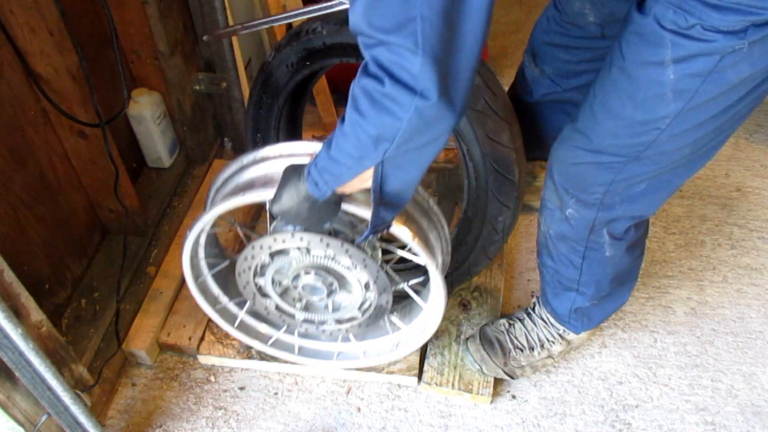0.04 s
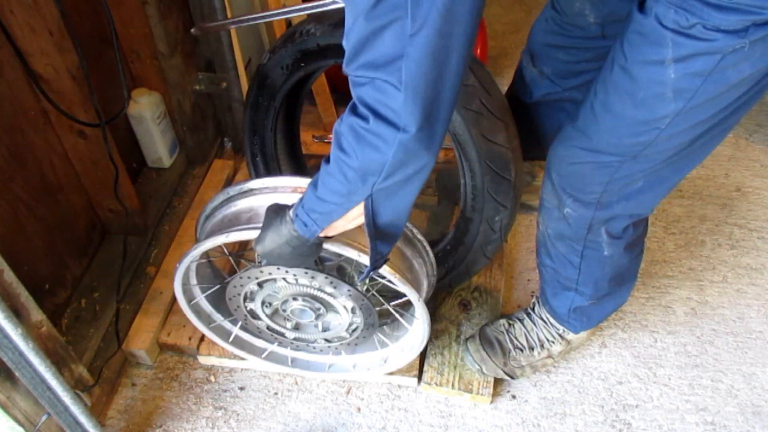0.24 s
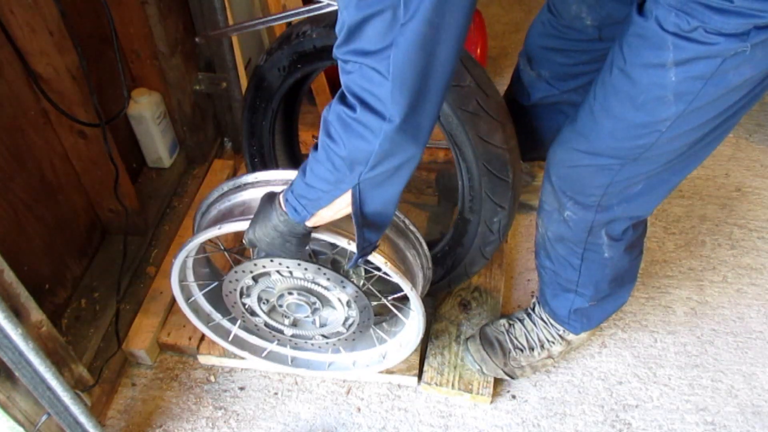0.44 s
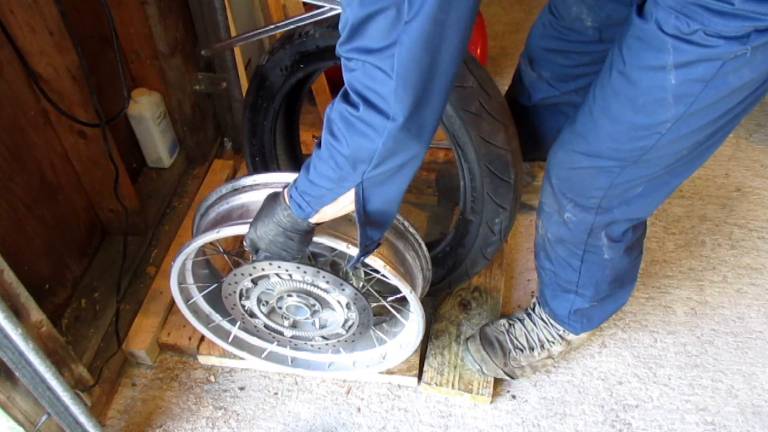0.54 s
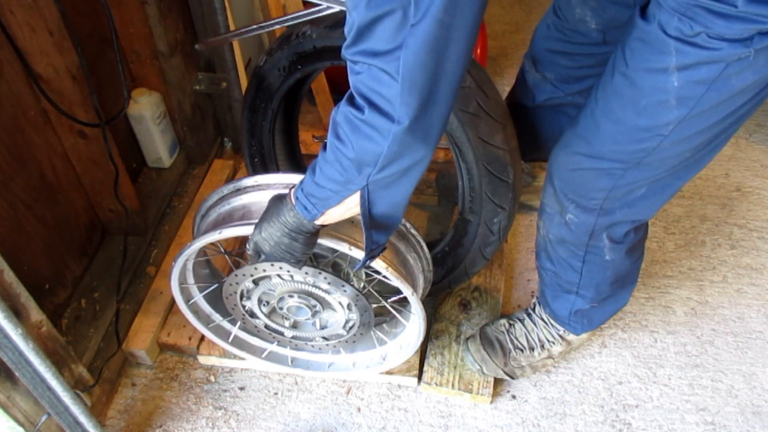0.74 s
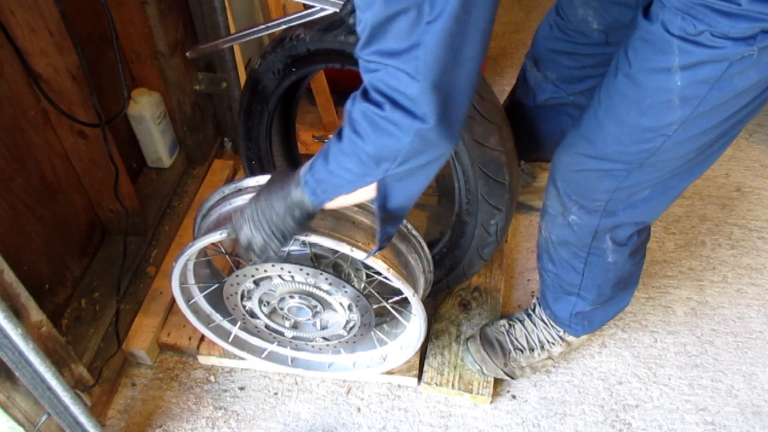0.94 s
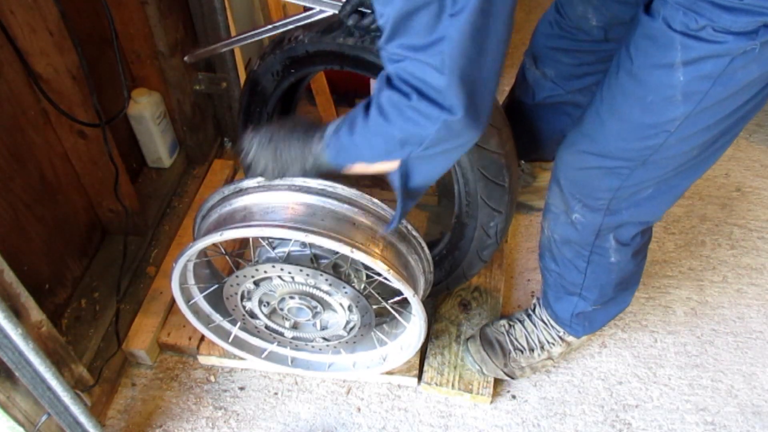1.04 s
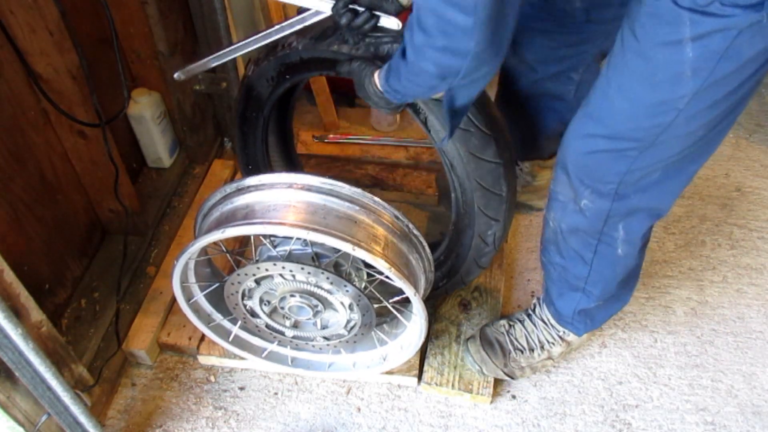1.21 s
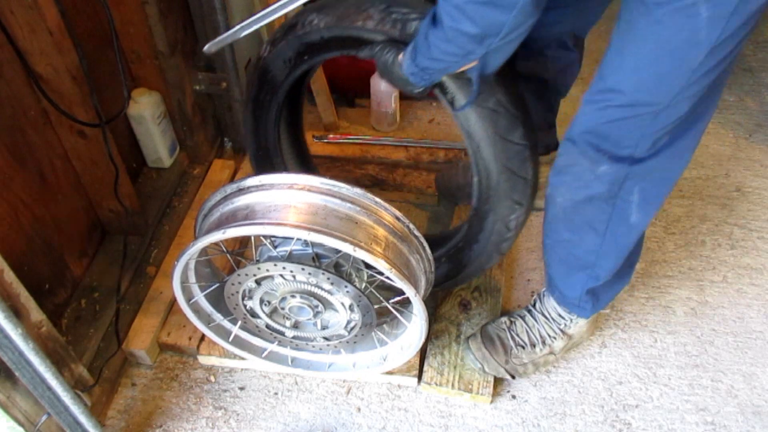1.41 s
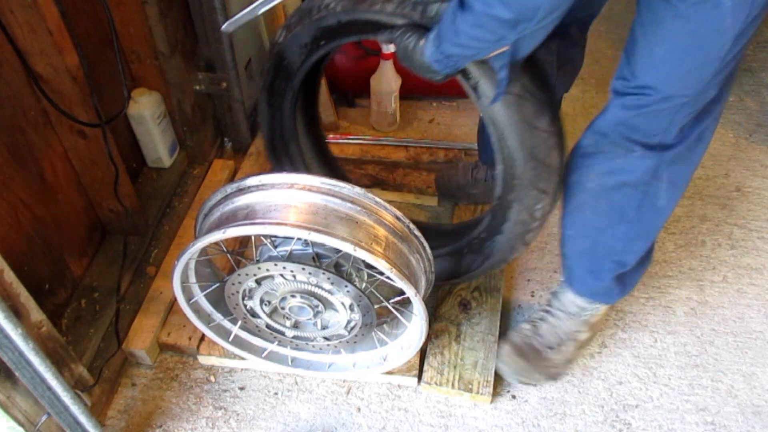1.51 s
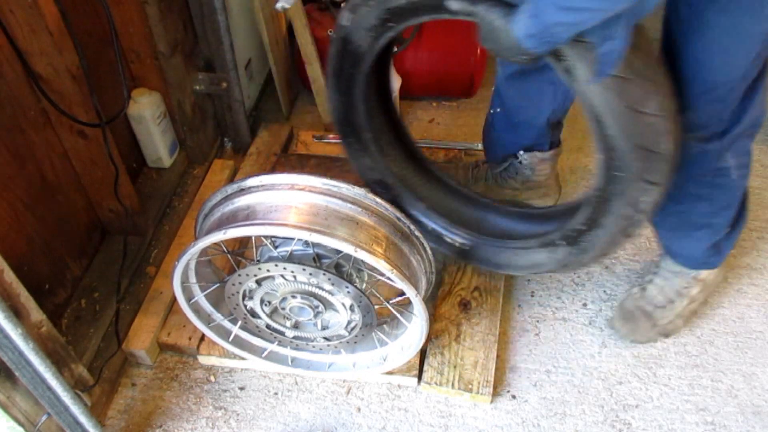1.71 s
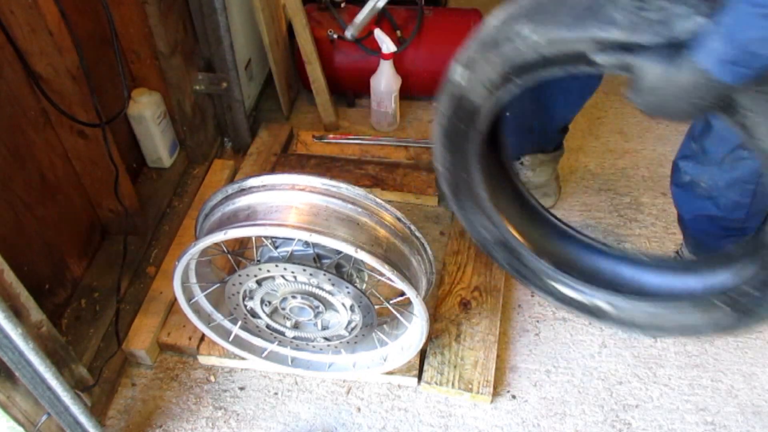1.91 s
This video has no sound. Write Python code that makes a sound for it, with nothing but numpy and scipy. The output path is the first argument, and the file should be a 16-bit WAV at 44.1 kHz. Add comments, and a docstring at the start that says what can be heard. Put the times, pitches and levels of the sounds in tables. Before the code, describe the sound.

A metal wheel rim lands on a wooden frame with a loud, close thud and a fading ring. Then overalls rustle faintly and a tire is lifted with soft bumps and scuffs in a small workshop.

```python
"""A thud and a metallic ring: a wheel rim is set down on a wooden frame in a small workshop.
One edge touches, then the whole weight lands; the frame knocks, the floor rumbles, the rim rings on.
Overalls rustle, a tire is gripped, lifted and scuffs along; a small bird chirps faintly far off.
The thud overloads the microphone and ducks its gain, which creeps back."""
import sys
import numpy as np
from scipy import signal
from scipy.fft import rfft, irfft
from scipy.io import wavfile

SR = 44100
rng = np.random.default_rng(int(sys.argv[2]) if len(sys.argv) > 2 else 0)


def pcm_store(signal):
    """Save signal as 16-bit PCM."""
    levels = np.round(np.clip(np.atleast_2d(signal), -1, 1) * 32767)
    wavfile.write(sys.argv[1], SR, levels.astype(np.int16).T)


N = 85995
T = np.arange(N) / SR

# rim on frame: (time [s], mode level [dB], place [0 edge .. 1 flat], crack level [dB])
BLOWS = [(0.2224, -13.5, 0.16, -32), (0.2510, -11.5, 0.6, -40), (0.254, 1, 0.91, -42.5),
         (0.2574, -28, 1, -21.5), (0.2637, -13.5, 0.38, -39)]
LANDING_S = max(BLOWS, key=lambda row: row[1])[0]  # hardest blow


def from_db(db):
    """Decibels to gain."""
    return 10 ** (np.asarray(db) / 20)


def noise(colour):
    """Unit-rms noise above 18 Hz; colour rows are (frequency [Hz], level [dB])."""
    hz, db = np.transpose(colour)
    bins_hz = np.maximum(np.arange(N // 2 + 1) * SR / N, 1)
    gain = from_db(np.interp(np.log(bins_hz), np.log(hz), db)) * (bins_hz > 18)
    x = irfft(rfft(rng.standard_normal(N)) * gain, N)
    return x / x.std()


def lowpass(x, hz, order=2):
    """Butterworth low-pass."""
    return signal.sosfilt(signal.butter(order, min(hz, .45 * SR), fs=SR, output="sos"), x + 1e-18)


def decay(at_s, t60_s):
    """Exponential decay from at_s."""
    return (T >= at_s) * from_db(-60 * np.maximum(T - at_s, 0) / t60_s)


def ring(at_s, hz, t60_s):
    """One struck mode; the yielding contact builds it up over its first cycles."""
    build_s = min(1.884 / hz, .005)
    build = np.sin(np.pi / 2 * np.clip((T - at_s) / build_s, 0, 1)) ** 2
    return build * decay(at_s, t60_s) * np.sin(2 * np.pi * hz * (T - at_s))


def swell(peak_s, rise_s, fall_s):
    """Gaussian envelope with separate rise and fall widths."""
    return np.exp(-.5 * ((T - peak_s) / np.where(T < peak_s, rise_s, fall_s)) ** 2)


def air():
    """Steady, dark background noise."""
    # spectrum: (frequency [Hz], level [dB])
    colour = [(25, -11), (80, -6.5), (230, -11), (380, -14), (600, -15), (1000, -17.5), (2800, -23),
              (6000, -27), (10000, -32), (13000, -36.5), (15800, -44)]
    return from_db(-57.5) * noise(colour)


def workshop_echo(x):
    """Diffuse echo of the wooden room; the treble dies sooner."""
    # room response: (frequency [Hz], level [dB])
    colour = [(40, -13.5), (150, -3), (350, -3.5), (550, -1), (850, -10.5), (1300, -1), (2000, -1.5),
              (2450, 6), (2700, 1.5), (4000, 2.5), (6000, 2.5), (15000, -10)]
    nearest_wall_s, build_s = .005, .0063
    diffuse = noise(colour)
    low = lowpass(diffuse, hz=2700, order=1)
    tail = low * decay(0, t60_s=.33) + (diffuse - low) * decay(0, t60_s=.22)
    tail *= 1 - np.exp(-np.maximum(T - nearest_wall_s, 0) / build_s)
    return signal.fftconvolve(x, tail / np.sqrt(np.sum(tail ** 2)))[:N]


def bird():
    """Short gliding whistles."""
    # chirps: (time [s], length [s], start [Hz], end [Hz], level [dB])
    chirps = [(0.935, 0.03, 3200, 2960, -57), (1.09, 0.019, 2600, 2970, -58),
              (1.134, .024, 2550, 3420, -58), (1.153, .02, 3650, 3450, -61),
              (1.161, 0.036, 3200, 2560, -54.5)]
    out = 0
    for at_s, length_s, start_hz, end_hz, db in chirps:
        along = np.clip((T - at_s) / length_s, 0, 1)
        hz = start_hz + (end_hz - start_hz) * along
        out += from_db(db) * np.sin(np.pi * along) * np.sin(2 * np.pi * np.cumsum(hz) / SR)
    return out


def grain(depth_db, bandwidth_hz):
    """Uneven catching of a rubbed surface, as a unit-rms gain."""
    jitter = lowpass(rng.standard_normal(N), bandwidth_hz)
    gain = from_db(-depth_db * jitter / jitter.std())
    return gain / np.sqrt(np.mean(gain ** 2))


def scuffs():
    """Cloth and rubber scuff: a hiss over a low scrape."""
    # strokes: (peak [s], level [dB], rise [s], fall [s], scrape re hiss [dB])
    strokes = [(0.075, -59, 0.046, 0.066, -2.5), (1.244, -53.5, .002, 0.008, -34),
               (1.318, -57.5, 0.033, 0.041, -11), (1.324, -55, 0.0063, 0.0052, 6),
               (1.582, -64, 0.32, 0.12, 1), (1.85, -56.5, 0.028, 0.023, 6.5)]
    # friction spectra: (frequency [Hz], level [dB])
    hiss_colour = [(300, -9), (1000, -14), (2000, -1), (4500, -1.5), (8000, -4.5), (12000, -10),
                   (16000, -23.5)]
    scrape_colour = [(30, -4), (130, -5), (300, -6.5), (500, -2), (750, -2.5), (1100, -11), (2200, -13.5),
                     (6000, -38)]
    hiss, scrape = noise(hiss_colour), noise(scrape_colour)
    return sum(from_db(db) * swell(peak_s, rise_s, fall_s) * (hiss + from_db(scrape_db) * scrape)
               for peak_s, db, rise_s, fall_s, scrape_db in strokes)


def slides():
    """Rubber and glove slide: slow swells of resonant noise."""
    # strokes: (peak [s], level [dB], rise [s], fall [s])
    strokes = [(0.138, -62, 0.11, 0.14), (1.91, -52, 0.14, .15)]
    # friction spectrum: (frequency [Hz], level [dB])
    colour = [(100, -11.5), (400, -8.5), (1100, -5), (1350, 2.5), (1600, -10), (2050, -8), (2300, 5.5),
              (2600, -5), (3100, 3.5), (3650, -9), (4100, -1.5), (4400, -7), (4700, 0.5), (5200, -16),
              (15000, -30)]
    envelope = sum(from_db(db) * swell(peak_s, rise_s, fall_s) for peak_s, db, rise_s, fall_s in strokes)
    return noise(colour) * envelope


def clicks():
    """Glove and spokes tick as the grip shifts."""
    # ticks: (time [s], level [dB], t60 [s])
    ticks = [(0.121, -37, 0.012), (0.127, -32.5, 0.0089), (0.134, -53, 0.015), (0.1382, -49, 0.057),
             (1.243, -50.5, 0.011), (1.3245, -50, 0.006)]
    # tick spectrum: (frequency [Hz], level [dB])
    colour = [(200, -2.5), (1200, 0.5), (2200, -9), (2800, 8.5), (3500, -2), (7000, -10.5), (15000, -30.5)]
    return noise(colour) * sum(from_db(db) * decay(at_s, t60_s) for at_s, db, t60_s in ticks)


def knocks():
    """Dull bumps of tire and boot; a softer contact leaves only the low modes."""
    # bumps: (time [s], level [dB], cutoff [Hz])
    bumps = [(1.2955, -27.5, 101), (1.321, -54.5, 550), (1.414, -53.5, 500), (1.53, -54, 1000),
             (1.6085, -44.5, 1600), (1.823, -43.5, 600), (1.8443, -40.5, 500), (1.902, -41, 380)]
    # tire modes: (frequency [Hz], level [dB], t60 [s])
    modes = [(74.1, -38.5, 0.15), (164, -6.5, 0.089), (301.7, 1, 0.075), (421, -5, 0.061), (617, -3, 0.044),
             (790, 3.5, 0.028), (1095, 12, 0.011), (1620, 5.5, 0.018)]
    out = 0
    for at_s, db, cutoff_hz in bumps:
        for k, (hz, mode_db, t60_s) in enumerate(modes):
            gain = from_db(db + mode_db) / np.hypot(1, (hz / cutoff_hz) ** 2)
            out += (-1) ** k * gain * ring(at_s, hz, t60_s)
    return out


def floor_boom():
    """Floor and walls rumble after the landing."""
    # rumble spectrum: (frequency [Hz], level [dB])
    colour = [(25, -6), (55, 6), (100, 0.5), (145, -4), (200, -19.5), (400, -50)]
    rise_s = .014
    onset = np.clip((T - LANDING_S) / rise_s, 0, 1)
    return from_db(-40) * noise(colour) * onset * decay(LANDING_S, t60_s=1.05)


def rim():
    """The rim hums in the hand, then rings in close, beating modes from the landing."""
    # free rim modes: (frequency [Hz], level [dB], t60 [s])
    modes = [(398, -34, 0.28), (621, -33.5, 0.2), (716, -56, 4), (746, -38.5, 2.64), (990, -44, 2),
             (970, -45, 1.6), (976, -55, 1.3), (1005, -40, 1.1), (1026, -44.5, 1.6), (1024, -46.5, 1.8),
             (1247, -29, 0.252), (1320, -17.5, 0.2), (1335.6, -19.5, 0.13), (1540, -65, 1.2),
             (1550, -54, 1.5), (2340, -54, 0.83), (2520, -55, .9), (2920, -43, .35), (3390, -46.5, 0.21),
             (4490, -54, 0.2), (5260, -51.5, .22), (5140, -50, .25)]
    hum_hz = 1002
    hum = from_db(-54.5) * swell(peak_s=.055, rise_s=.035, fall_s=.035) * np.sin(2 * np.pi * hum_hz * T)
    return hum + sum(from_db(db) * ring(LANDING_S, hz, t60_s) for hz, db, t60_s in modes)


def frame_thud():
    """Each blow cracks and rings the frame; where it lands decides which modes answer."""
    # frame modes: (frequency [Hz], t60 [s], struck at the edge [dB], struck flat [dB])
    modes = [(83, .18, -16.5, -34), (144.2, 0.11, -13, -36.5), (193.3, 0.061, -1.5, -31),
             (340, 0.036, -16, -10.5), (692, 0.04, 1, -17), (896.4, .085, -2, -18),
             (870, 0.025, -10.5, -1.5), (992, 0.021, -12.5, -9.5), (1491, .026, -41, -6),
             (1629, 0.027, -29.5, -13), (2256, 0.045, -28, -30), (3414, .02, -31, -41.5)]
    # contact crack spectrum: (frequency [Hz], level [dB])
    crack_colour = [(200, -5.5), (1500, 7.5), (3500, -8.5), (6000, -15.5), (10000, -24), (16000, -34)]
    out, crack = 0, noise(crack_colour)
    for at_s, db, place, crack_db in BLOWS:
        out += from_db(crack_db) * crack * decay(at_s, t60_s=.023)
        for hz, t60_s, edge_db, flat_db in modes:
            mode_db = edge_db + place * (flat_db - edge_db)
            out += from_db(db + mode_db) * ring(at_s, hz, t60_s)
    return out


def scene():
    """Mono mix; only the contacts and the bird feed the echo."""
    contacts = frame_thud() + clicks() + knocks()
    chirps = bird()
    echo = workshop_echo(from_db(-6.5) * contacts + from_db(-7.5) * chirps)
    rumble = floor_boom()
    rubbing = (scuffs() + slides()) * grain(depth_db=1.5, bandwidth_hz=880)
    return (contacts + chirps + echo + rim() + rumble + rubbing + air())[None]


def record(dry):
    """Microphone: low cut, gain ducking just after peaks with slow recovery, soft clip, high cut."""
    low_cut_hz, high_cut_hz, clip_level = 34.5, 15900, .5
    threshold_db, slope = -12.5, .84
    attack_s, lag_s, recover_db_per_s = .0083, .0045, 5.5
    x = dry - lowpass(dry, low_cut_hz, order=1)
    duck_db = slope * np.maximum(20 * np.log10(np.abs(x) + 1e-9) - threshold_db, 0)
    recovery_db = recover_db_per_s * T
    held_db = np.maximum.accumulate(duck_db + recovery_db, axis=-1) - recovery_db
    late_db = np.interp(T - lag_s, T, held_db[0])
    pole = np.exp(-1 / (attack_s * SR))
    x = x * from_db(-signal.lfilter([1 - pole], [1, -pole], late_db))
    clipped = x / (1 + (x / clip_level) ** 6) ** (1 / 6)
    return signal.sosfilt(signal.ellip(10, .1, 70, high_cut_hz, fs=SR, output="sos"), clipped)


dry = scene()
out = record(dry)
pcm_store(out)
```